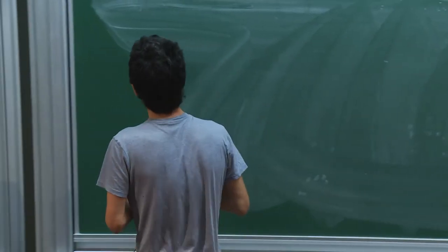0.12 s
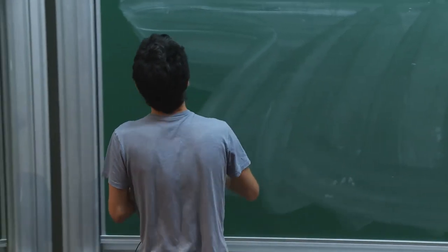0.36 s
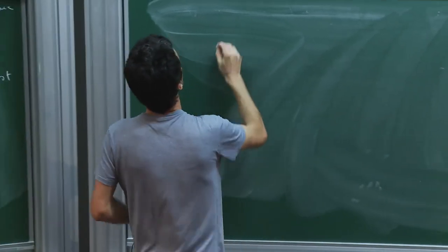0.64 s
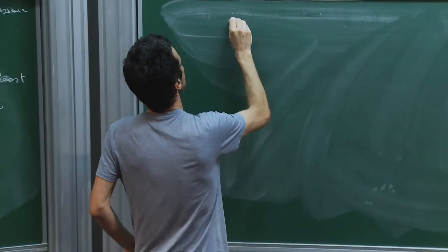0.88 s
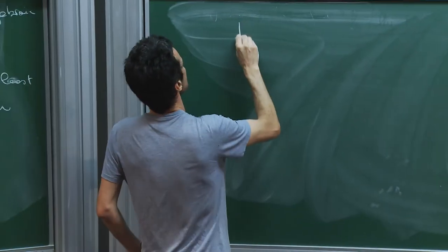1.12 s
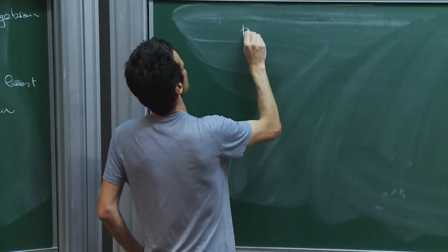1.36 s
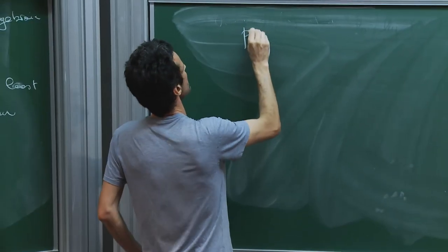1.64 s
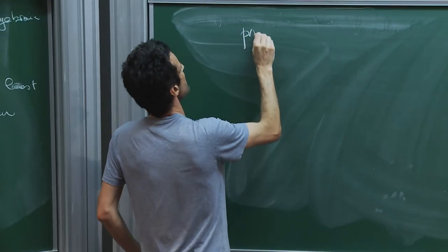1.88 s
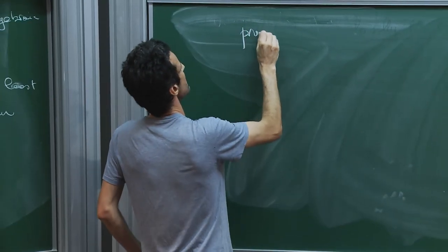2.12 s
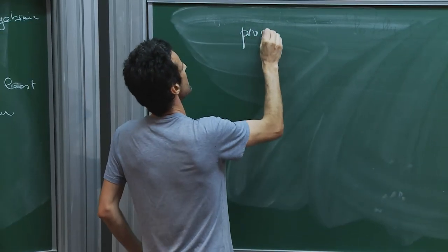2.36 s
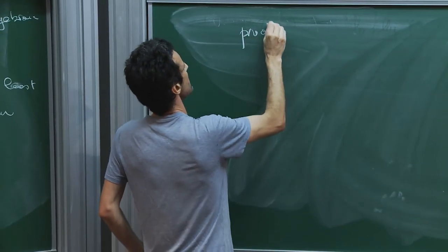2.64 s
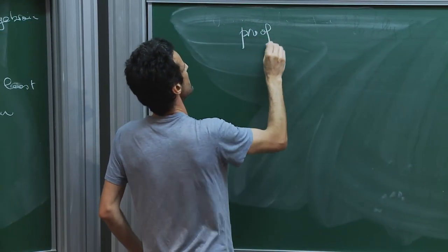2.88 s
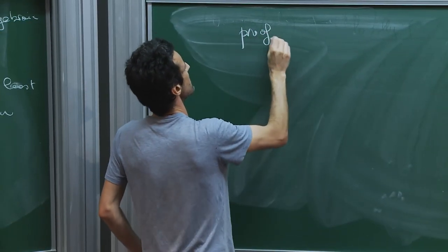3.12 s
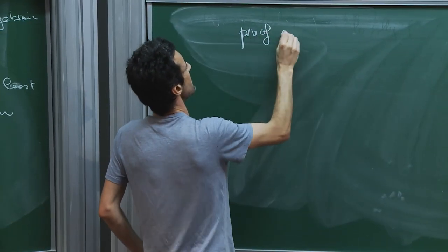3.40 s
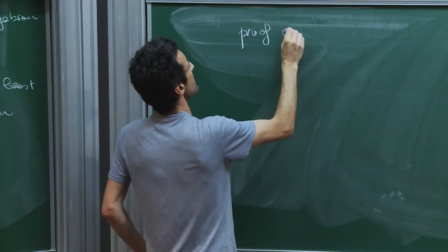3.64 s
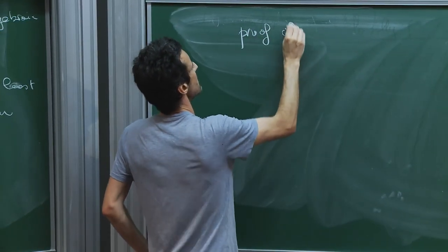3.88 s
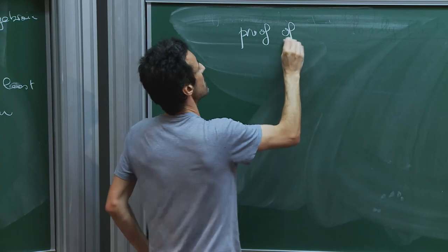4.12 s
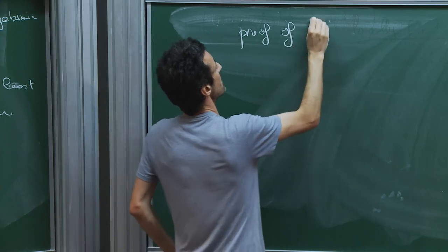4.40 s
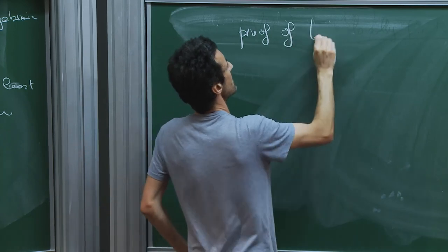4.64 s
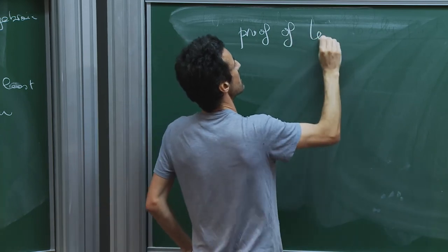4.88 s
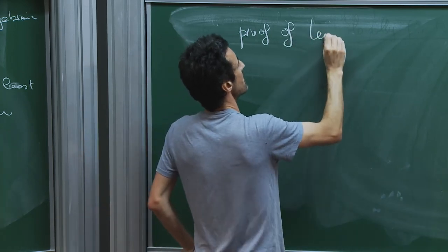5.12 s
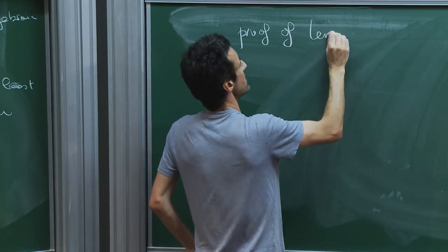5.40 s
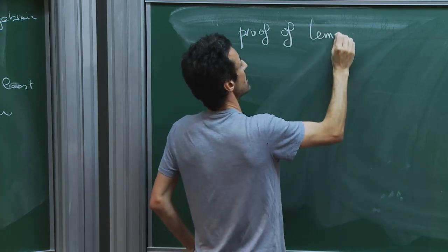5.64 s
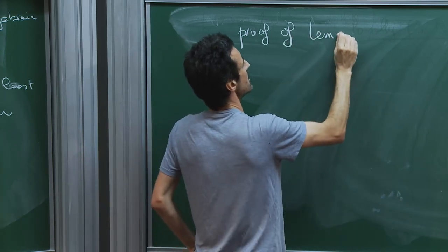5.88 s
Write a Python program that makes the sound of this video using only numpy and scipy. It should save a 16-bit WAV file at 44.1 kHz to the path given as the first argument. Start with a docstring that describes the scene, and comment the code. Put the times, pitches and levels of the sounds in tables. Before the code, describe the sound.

Cloth rustles and crackles close by over faint ventilation, then chalk taps a blackboard and scrapes out short strokes, ending with a hard clack.

```python
"""A shirt rustles and crackles over lecture-room ventilation, heard by a microphone clipped to the writer's shirt.
Then chalk lands on a wall-hung blackboard and scrapes out letters. Each landing rings the modes of board and
stick; while the stick moves, crumbling grit excites resonances of board and chalk. Cloth is rough coloured
noise with snapping threads, ventilation is duct rumble and hiss, and brief faint chirps are thin unsteady tones."""
import sys
import numpy as np
from scipy import signal
from scipy.fft import rfft, irfft, next_fast_len
from scipy.io import wavfile
from scipy.ndimage import uniform_filter1d, map_coordinates

SR = 44100
rng = np.random.default_rng(int(sys.argv[2]) if len(sys.argv) > 2 else 0)


def elevation(decibels):
    """Turn decibel levels (scalar or array-like) into linear amplitude ratios."""
    levels = np.asarray(decibels, float)
    return 10 ** (levels / 20)


def dump_mix(stems):
    """Bounce the given channels to the path in sys.argv[1] as a 16-bit WAV at rate SR."""
    frames = np.atleast_2d(stems).T  # one column per channel
    limited = np.clip(frames, -1, 1)  # hard clip at full scale
    pcm = np.round(limited * 32767).astype(np.int16)
    wavfile.write(sys.argv[1], SR, pcm)


N = 264996
TIME = np.arange(N) / SR


def unit(x):
    """Scaled to rms 1."""
    return x / np.sqrt(np.mean(x ** 2) + 1e-20)


def along(points, hz):
    """(Hz, value) points read on a log frequency axis."""
    f, v = np.transpose(points)
    return np.interp(np.log(hz + 1), np.log(f + 1), v)


def wobble(rate):
    """A smooth random curve with rate knots a second."""
    knots = rng.standard_normal(int(N * rate / SR) + 4)
    return map_coordinates(knots, [TIME * rate])


def filtered(x, response):
    """x times a complex response of frequency."""
    m = next_fast_len(N + SR // 2)
    return irfft(rfft(x, m) * response(np.fft.rfftfreq(m, 1 / SR)), m)[:N]


def coloured(x, spectrum):
    """x with a (Hz, dB) colour, rms 1."""
    return unit(filtered(x, lambda hz: elevation(along(spectrum, hz))))


def ringing(x, peaks):
    """x through parallel resonances of alternating sign, rms 1."""
    def response(f):
        total = 0
        for k, (centre, width, db) in enumerate(peaks):
            band = 1j * f * width / (centre * centre - f * f + 1j * f * width)
            total = total + (-1) ** k * elevation(db) * band
        return total
    return unit(filtered(x, response))


def grit(lumpy_db, rate):
    """Crumbling grains: noise whose size wanders at rate knots a second, with a few larger grains that snap."""
    snaps = (rng.random(N) < .004) * rng.standard_normal(N) * 5
    return (rng.standard_normal(N) + snaps) * elevation(lumpy_db * wobble(rate))


# strokes of cloth: (start [s], length [s], rub [dB], bright swish relative to the rub [dB])
CLOTH_MOVES = [(0, 0.12, -57, -2.5), (0.11, 0.13, -67, -5), (0.195, 0.13, -71.5, -1),
               (0.396, 0.16, -60, -6.5), (0.48, 0.29, -67.5, -3.5), (0.673, 0.041, -76, -8),
               (.738, 0.056, -61.5, -8), (3.13, 0.068, -82, 4), (4.193, 0.083, -70.5, 2.5),
               (5.588, 0.062, -74, 7)]
# dull rub and bright swish of the cloth: (frequency [Hz], relative level per Hz [dB])
RUB_COLOUR = [(120, -15), (200, -9), (399, -7), (762, -11.5), (834, -8), (3000, -15.5), (3900, -22),
              (6600, -120)]
SWISH_COLOUR = [(1470, -31), (2500, -24), (2990, -3.5), (4580, 2), (5650, -5), (6600, 0.5), (16000, -18.5)]
# dry thread snaps: (time [s], level [dB], bump relative to the snap [dB], pitch [Hz])
THREAD_SNAPS = [(0.0154, -52, -12, 4000), (0.0818, -46, -3, 6000), (.139, -53, -19, 11000),
                (.155, -44, -17, 6000), (0.157, -47, -20, 5000), (.168, -47, -17, 5000),
                (0.174, -43.5, -10, 11000), (.308, -46, -13, 9000), (0.505, -52, -13, 8000),
                (0.515, -38, -8.5, 6000), (.676, -45, -15, 8000), (0.6841, -46, -6, 4000),
                (0.6903, -43, -2.5, 7040), (0.7487, -47, -1, 9000), (0.7558, -46, -17, 4000),
                (0.7588, -43, -6, 9000), (0.7601, -47, -4, 4000), (.7667, -47, -19, 12000),
                (0.7778, -39, -16, 11500), (.7877, -50, -12, 11000), (0.79, -44, -16, 12000),
                (0.8148, -46.5, -1, 6500), (0.8285, -40.5, -5, 7000), (1.0933, -39.5, -15, 11000),
                (1.6017, -42, -25, 3520), (1.604, -43, -20, 7000), (3.5704, -45, -5.5, 4500),
                (3.745, -49, -15, 5000), (3.7866, -35, -16, 12000), (3.788, -42, -15, 3000),
                (3.84, -49, -11, 4500), (3.882, -47, -14, 5500), (4.086, -46, -28, 4500),
                (4.2042, -49, -6, 7000)]


def shirt():
    """Cloth drags past the capsule; single threads let go with a short snap and a soft bump."""
    rise_share, fall_power = .22, 0.87  # share of the length spent rising, bend of the fall
    snap_cycles = 0.21  # time from onset to the envelope's peak, in cycles of the snap's pitch
    dull = coloured(grit(lumpy_db=2.0, rate=160), RUB_COLOUR)
    bright = coloured(grit(lumpy_db=3.0, rate=340), SWISH_COLOUR)
    out = np.zeros(N)
    for start, length, rub_db, swish_db in CLOTH_MOVES:
        done = np.clip((TIME - start) / length, 0, 1)
        fall = ((1 - done) / (1 - rise_share)) ** fall_power
        envelope = np.minimum(done / rise_share, fall)
        out += elevation(rub_db) * envelope * (dull + elevation(swish_db) * bright)
    t = np.arange(SR // 25) / SR
    for at, db, bump_db, hz in THREAD_SNAPS:
        age = t * hz / snap_cycles
        snap = age * np.exp(1 - age) * np.sin(2 * np.pi * hz * t)
        bump = elevation(bump_db) * np.sin(2 * np.pi * 170 * t + 2.0) * elevation(-60 * t / 0.019)
        out[round(at * SR):][:len(t)] += elevation(db) * (snap + bump)
    return out


# colour of the duct rumble: (frequency [Hz], relative level per Hz [dB])
DUCT_COLOUR = [(12, -30), (26, 11), (34, -4), (42, -1.5), (62, -4.5), (78, -11.5), (102, -7.5),
               (140, -20.5), (180, -46), (310, -120)]
# colour of the soft hiss: (frequency [Hz], relative level per Hz [dB])
AIR_COLOUR = [(71, -62), (120, -5.5), (266, -7.5), (409, -10.5), (481, -23), (653, -11), (769, -20),
              (870, -19), (944, -14.5), (1000, -16.5), (1130, -16), (3490, -21.5), (4450, -17), (5140, -22),
              (15800, -31)]


def ventilation():
    """Duct rumble that swells and sinks under a soft, gently fluttering hiss."""
    rumble_db, hiss_db = -65, -68
    swell_db = 1.1 * wobble(2.4)
    rumble = elevation(rumble_db + swell_db) * coloured(rng.standard_normal(N), DUCT_COLOUR)
    flutter_db = .6 * wobble(5)
    hiss = elevation(hiss_db + flutter_db) * coloured(rng.standard_normal(N), AIR_COLOUR)
    return rumble + hiss


# brief faint chirps: (start [s], level [dB], pitch [Hz], length [s])
CHIRP_NOTES = [(0.118, -61, 2860, 0.014), (0.12, -61, 4170, 0.011), (0.228, -70, 3720, .01),
               (0.244, -62, 3760, 0.013), (0.54, -67, 4650, 0.094), (1.528, -61, 3910, 0.019),
               (2.522, -57, 4070, 0.017), (2.743, -56, 4050, 0.013), (2.794, -53, 4200, 0.012)]


def chirps():
    """Short thin tones with soft edges and an unsteady pitch."""
    unsteady_time = np.cumsum(1 + 0.027 * wobble(300)) / SR
    out = np.zeros(N)
    for start, db, hz, length in CHIRP_NOTES:
        envelope = np.sin(np.pi * np.clip((TIME - start) / length, 0, 1)) ** 2
        out += elevation(db) * envelope * np.sin(2 * np.pi * hz * unsteady_time)
    return out


# decay of the lecture room: (frequency [Hz], t60 [s])
ROOM_DECAY = [(60, 0.95), (160, 0.46), (420, 0.49), (1100, 0.27), (2900, 0.31), (8000, 0.34)]


def room(x):
    """Reverb from decaying noise: each frequency dies at its own speed, after a short fade-in."""
    hz, t, z = signal.stft(rng.standard_normal(SR), SR, nperseg=256)
    decay_db = -60 * t / along(ROOM_DECAY, hz)[:, None]
    colour_db = along([(100, 0.0), (400, -10.0), (1000, -10.0), (8000, -5)], hz)[:, None]
    tail = signal.istft(z * elevation(decay_db + colour_db), SR, nperseg=256)[1]
    tail *= np.clip(np.arange(len(tail)) / SR / 0.009, 0, 1) ** 2
    return signal.fftconvolve(x, tail / np.linalg.norm(tail))


# landings of the chalk: (time [s], thud [dB], knock [dB], clack [dB], click [dB])
LANDINGS = [(0.8349, -28.5, -44.5, -44.5, -33.5), (1.2297, -31, -47, -26.5, -19),
            (2.1899, -30, -41.5, -29, -19.5), (3.3295, -24, -33.5, -30.5, -13),
            (4.427, -26, -36, -46, -25.5), (5.4341, -54.5, -72, -65, -38), (5.6494, -20.5, -42, -21, -6)]
# where thud, knock, clack, click and splintering edge sit in the spectrum: (frequency [Hz])
LANDING_COLOUR_HZ = [300, 1000, 1550, 2500, 4200]
# modes of struck board and stick: (pitch [Hz], relative level [dB], t60 [s], rise [ms])
BOARD_MODES = [(116, -30, 0.07, 4.3), (161.7, -27.5, 0.19, 11), (301.5, -23.5, 0.55, 16),
               (607.7, -22.5, 0.15, 3.7), (149, -4.5, 0.024, 0.2), (238, 2, 0.027, 0.9),
               (300, 1, 0.021, 1.06), (415, -14, 0.0078, 0.34), (623.4, -8, 0.038, 0.14),
               (915, 5, 0.012, 0.22), (1076, 9, 0.021, 0.61), (1434, 13, 0.021, 3), (1660, 7, 0.0089, 2.8),
               (1960, 10, 0.0089, 1.22), (2122, 4, 0.0053, 0.18), (2693, 5.5, 0.0055, 0.44),
               (2759, -13, 0.018, 0.83), (3070, -12.5, 0.019, 0.04), (3420, 0.5, 0.0057, 0.23),
               (3880, -9.5, 0.012, 0.033), (4720, -17, 0.017, 0.39), (4980, -23, 0.03, 0.18),
               (6000, -15.5, 0.036, 0.1), (6850, -13, 0.013, 0.091), (7730, -14.5, 0.026, 0.48),
               (8850, -13, 0.0049, 0.14), (10940, -19, 0.0069, 0.12), (13900, -21, 0.0065, .2)]
# bounces between board and writer: (delay [ms], level [dB])
NEAR_BOUNCES = [(1.25, -5.5), (2.401, -11), (4., -36), (6.5, -20)]
# the whole board gives on its mounts:
# (pitch [Hz], level relative to the mean of thud and click [dB], t60 [s])
MOUNT_SWAY = (29, -24, 0.14)


def taps():
    """Each landing rings every mode; how the stick meets the board sets the colour."""
    out, t = np.zeros(N + 2 * SR), np.arange(SR // 4) / SR
    hz, mode_db, t60, rise_ms = np.transpose(BOARD_MODES)[:, :, None]
    sway_hz, sway_db, sway_t60 = MOUNT_SWAY
    build = (1 - np.exp(-1000 * t / rise_ms)) ** 2
    for at, thud_db, knock_db, clack_db, click_db in LANDINGS:
        edge_db = -12.5 + 0.37 * clack_db + 0.59 * click_db
        colour_db = [thud_db, knock_db, clack_db, click_db, edge_db]
        colour = np.transpose([LANDING_COLOUR_HZ, colour_db])
        db = mode_db + along(colour, hz) + 1.5 * rng.standard_normal(hz.shape)
        # the landing spot shifts the upper modes against each other
        lag = .7 * (hz > 800) * rng.standard_normal(hz.shape)
        modes = elevation(db - 60 * t / t60) * build * np.cos(2 * np.pi * hz * (t - .00015) + lag)
        # the chalk tip splinters: a short bright crack
        crack = elevation(edge_db - 31 - 60 * t / 0.026) * np.diff(rng.standard_normal(len(t) + 1))
        ring = modes.sum(0) + crack
        near = ring.copy()
        for delay_ms, echo_db in NEAR_BOUNCES:
            near += elevation(echo_db) * np.interp(t - delay_ms / 1000, t, ring, left=0)
        wet = elevation(-11.5) * room(near)
        sway_level = elevation(.5 * (thud_db + click_db) + sway_db - 60 * t / sway_t60)
        # subtracted: the board moves away from the writer first
        near -= sway_level * np.cos(2 * np.pi * sway_hz * t) * (1 - np.exp(-t / 0.0039))
        out[round(at * SR):][:len(near)] += near
        out[round(at * SR):][:len(wet)] += wet
    return out[:N]


def patchy(x, patch_db):
    """The contact keeps changing shape: resonances come and go in patches."""
    z = signal.stft(x, nperseg=512)[2]
    field = uniform_filter1d(rng.standard_normal(z.shape), size=4, axis=0)
    field = uniform_filter1d(field, size=8, axis=1)
    return unit(signal.istft(z * elevation(patch_db * unit(field)), nperseg=512)[1][:N])


def swept(x, centre_hz, octaves):
    """The slant of the stick decides which of the fixed resonances speak; the level is evened out."""
    hz, t, z = signal.stft(x, SR, nperseg=512)
    away = np.log2((hz[:, None] + 1) / np.interp(t, TIME, centre_hz)) / octaves
    z = z * (0.18 + np.exp(-away ** 2))
    z = z / np.sqrt(uniform_filter1d(np.mean(abs(z) ** 2, 0), size=15))
    return unit(signal.istft(z, SR, nperseg=512)[1][:N])


# movements of the hand: (start [s], length [s], scrape [dB], pressure [dB], speed [dB])
HAND_MOVES = [(.9, 0.12, -63, -1.5, 0.5), (.95, .15, -62, 0.5, 0.5), (1.233, .09, -68, 7.5, -2),
              (1.281, .07, -64, -2, 2), (1.313, 0.13, -66.5, 2.5, -2), (1.406, 0.19, -70.5, 0, 0.5),
              (1.591, 0.14, -66, -1, 4.5), (1.739, 0.12, -62.5, -1, 0.5), (1.879, 0.1, -67, -0.5, 2.5),
              (1.943, 0.086, -70, 6, -9), (2.015, 0.089, -66.5, 4, -1), (2.204, 0.088, -65, 3.5, -4),
              (2.246, 0.2, -67.5, 0, 3), (2.398, 0.088, -66, 2.5, -5), (2.453, 0.22, -67, -0.5, 3),
              (2.619, 0.15, -65, 1, -3), (2.713, 0.13, -60.5, 0, 0), (2.789, 0.13, -56.5, -5, 1),
              (2.908, 0.099, -63.5, 2, -4.5), (2.974, 0.12, -65, -1, 1.5), (3.328, 0.1, -64.5, 2, -2),
              (3.39, 0.21, -67, -1, 1.5), (3.54, 0.091, -70.5, 9, -1), (3.59, 0.24, -67.5, -1, 2.5),
              (3.781, .12, -65.5, 5.5, -3), (3.868, 0.12, -62, 0.5, 4), (3.941, 0.099, -55.5, -5, 1.5),
              (4.038, 0.082, -60, 1.5, -2.5), (4.103, 0.063, -63.5, -9, 0.5), (4.151, 0.032, -62, -8.5, 5),
              (4.465, 0.15, -57, -3.5, 2.5), (4.615, 0.13, -61, -5.5, 3.5), (4.7, 0.14, -63, 0, -7),
              (4.757, 0.11, -61.5, 2, 3.5), (4.778, 0.036, -64, 11.5, -2.5), (4.841, 0.082, -61.5, -3, -1),
              (4.895, 0.11, -62.5, -0.5, -2), (5.027, 0.079, -64, 0.5, -0.5), (5.128, 0.08, -64, 1, -3),
              (5.227, 0.084, -66.5, 4, 1.5), (5.337, 0.078, -67, 5, -1.5), (5.43, 0.11, -64, 0.5, 1.5),
              (5.654, 0.099, -56, 0.5, -5.5), (5.754, 0.057, -65, 3.5, -5.5), (5.802, 0.08, -66.5, 5, -2),
              (5.892, 0.089, -62, 0, 1)]
# how each part follows a stroke: (level over the scrape [dB], share of pressure, share of speed,
# power of the arch in which the hand speeds up and slows down, at least 0.1 when played)
PART_FOLLOW = {"scrape": (0.05, 0, 0, 0.45), "drum": (-8.5, 1.1, 0.73, 0.8), "rasp": (-8.5, 1.33, -0.42, 0),
               "body": (-3.4, 0.97, -0.35, 0.17), "shoulder": (-4, 0.94, 1.08, 0.55),
               "stick": (-6.5, 0.34, 0.85, 0.83), "dust": (-4.5, 0.26, 1.16, 1.4)}
# resonances of each part: (centre [Hz], width [Hz], relative level [dB])
SCRAPE_PEAKS = [(2790, 220, -1.5), (3124, 210, -2), (3320, 138, 1.5), (3473, 320, 1), (3720, 210, -0.5)]
DRUM_PEAKS = [(173, 135, -7.5), (204.6, 40.6, 9), (285.5, 25.3, 11), (410, 170, 3.5)]
RASP_PEAKS = [(910, 81, 8), (1200, 154, 2), (1450, 108, 5.5), (1635, 100, 6.5)]
BODY_PEAKS = [(1932, 118, 3.5), (2264, 106, 1.5), (2560, 190, 0)]
SHOULDER_PEAKS = [(4050, 560, 1), (4400, 170, -1), (4520, 410, -5), (5490, 500, -0.5)]
STICK_PEAKS = [(5500, 570, -1.5), (6710, 160, -1), (7120, 170, -4), (7780, 140, 2), (8290, 100, -1.5),
               (9500, 60, -20)]
# colour of the shed dust: (frequency [Hz], relative level per Hz [dB])
DUST_COLOUR = [(5470, -12), (9300, -5), (11000, -6.5), (12100, -8.5), (12900, -7.5), (13600, -9),
               (15800, -11.5)]
# slant of the stick: (time [s], scrape centre [Hz], body centre [Hz], rasp centre [Hz])
STICK_SLANT = [(.9, 3000, 2250, 1340), (1.1, 3050, 2350, 1270), (1.3, 3000, 2160, 1420),
               (1.5, 3350, 2170, 1320), (1.66, 2920, 2350, 1420), (2.05, 3040, 2270, 1470),
               (2.4, 2930, 2260, 1400), (2.62, 3000, 2500, 1310), (2.74, 3200, 2460, 1010),
               (2.86, 3330, 2400, 1350), (2.95, 3150, 1970, 1510), (3.1, 3240, 2190, 1450),
               (3.5, 3380, 2420, 1240), (3.6, 3120, 2360, 1150), (3.72, 3380, 2500, 1260),
               (3.84, 3180, 2460, 1200), (4.0, 3190, 2320, 1400), (4.15, 3200, 2090, 1560),
               (4.45, 3150, 2340, 950), (4.62, 3350, 2120, 1200), (4.78, 3090, 2200, 1480),
               (5.0, 3420, 2320, 1400), (5.55, 3390, 2350, 1520), (5.7, 3080, 2380, 1570),
               (6, 3720, 2250, 1540)]
# how loosely the fingers hold the stick; loose lets it ring, tight sheds more dust: (time [s], level [dB])
FINGER_GRIP = [(.9, 3), (1.3, 4.5), (1.5, 2), (1.66, 3), (1.8, 2), (2.07, 4.5), (2.3, 3), (2.55, 3),
               (2.8, 1.5), (3.0, 2), (3.3, 1), (3.5, -1), (3.72, -2), (3.95, -0.5), (4.15, -2.5),
               (4.55, -2), (4.7, 1.5), (4.8, 2), (4.95, 1.5), (5.3, 2), (5.7, 0), (6, -2.5)]
# how much of the stick's face lies on the board; broad favours body over rasp: (time [s], level [dB])
CONTACT_FACE = [(.9, 0), (1.25, -2.5), (1.4, 0.5), (1.8, 1), (2.0, 0.5), (2.25, 0.5), (2.45, -0.5),
                (2.78, 2.5), (2.95, -4.5), (3.1, -1), (3.4, -1), (3.58, 1), (3.85, -2), (4.05, 0),
                (4.45, -2), (4.6, 0), (4.72, 4), (4.8, 0), (5.0, 3), (5.5, 2), (5.7, 2), (6, 2)]


def strokes():
    """While the stick moves, grains drive board and chalk, swelling and fading with each stroke."""
    judder_t60, judder_drum_db, judder_rasp_db = 0.33, -26.5, -17.5  # t60 [s], under thud, under knock
    grip_dust, face_rasp = -0.6, -0.52  # shares of grip in the dust and of face in the rasp
    start, length, scrape_db, pressure_db, speed_db = np.transpose(HAND_MOVES)[:, :, None]
    step = TIME[::32]  # coarse time for the envelopes
    arch = np.sin(np.pi * np.clip((step - start) / length, 0, 1)) * (step < start + length)
    power = {}
    for part, (db, press, speed, bend) in PART_FOLLOW.items():
        level = elevation(scrape_db + db + press * pressure_db + speed * speed_db)
        power[part] = (level ** 2 * arch ** (2 * np.clip(bend, .1, 3))).sum(0)
    # after a landing the stick judders on the board
    for at, thud_db, knock_db, *_ in LANDINGS:
        fading_db = np.where(step > at, -60 * (step - at) / judder_t60, -200)
        power["drum"] = power["drum"] + elevation(thud_db + judder_drum_db + fading_db) ** 2
        power["rasp"] = power["rasp"] + elevation(knock_db + judder_rasp_db + fading_db) ** 2

    slant_time, *columns = np.transpose(STICK_SLANT)
    scrape_hz, body_hz, rasp_hz = [np.interp(TIME, slant_time, column) for column in columns]
    grip_db = np.interp(TIME, *np.transpose(FINGER_GRIP))
    face_db = np.interp(TIME, *np.transpose(CONTACT_FACE))
    grains = patchy(grit(lumpy_db=1.2, rate=190), patch_db=1.7)
    drum_grains = grit(lumpy_db=1.5, rate=60)
    parts = {
        "scrape": swept(ringing(grains, SCRAPE_PEAKS), scrape_hz, octaves=0.16),
        "drum": ringing(drum_grains, DRUM_PEAKS),
        "rasp": elevation(face_rasp * face_db) * swept(ringing(grains, RASP_PEAKS), rasp_hz, octaves=0.46),
        "body": elevation(face_db) * swept(ringing(grains, BODY_PEAKS), body_hz, octaves=0.27),
        "shoulder": ringing(grains, SHOULDER_PEAKS),
        "stick": elevation(grip_db) * ringing(grains, STICK_PEAKS),
        "dust": elevation(grip_dust * grip_db) * coloured(grains, DUST_COLOUR),
    }
    dry = np.zeros(N)
    for name, part in parts.items():
        envelope = np.interp(TIME, step, np.sqrt(power[name]))
        dry += envelope * elevation(0.62 * wobble(30)) * part
    dry *= elevation(0.25 * wobble(40))
    return dry + elevation(-8.5) * room(dry)[:N]


def scene():
    """Everything summed at one capsule."""
    return (shirt() + ventilation() + chirps() + taps() + strokes())[None]


def top_cut(x):
    """Nothing passes above the cut-off."""
    return signal.sosfilt(signal.butter(12, 16550, fs=SR, output="sos"), x)


def record(dry):
    """The finished mix is low-passed steeply at 15.83 kHz."""
    top_hz = 15830
    mix = filtered(dry[0], lambda hz: hz < top_hz)[None]
    return top_cut(mix)


dry = scene()
out = record(dry)
dump_mix(out)
```